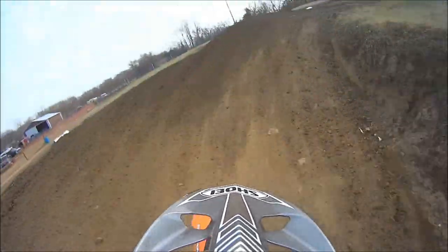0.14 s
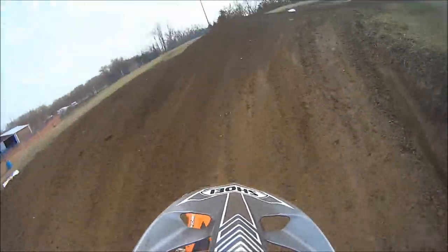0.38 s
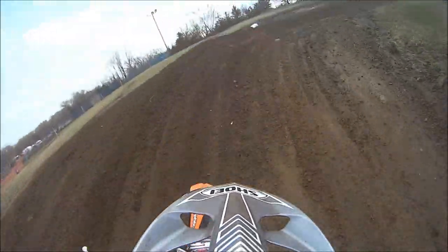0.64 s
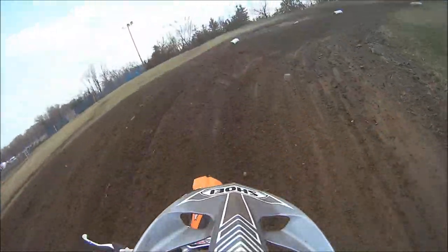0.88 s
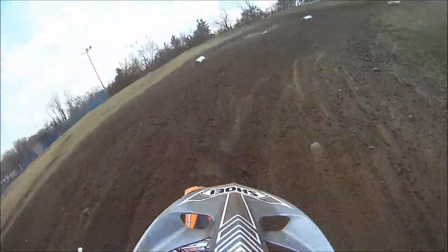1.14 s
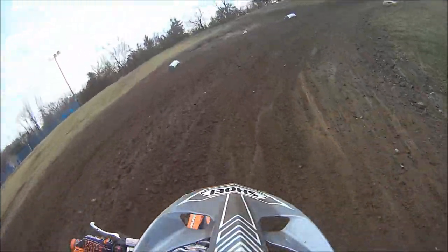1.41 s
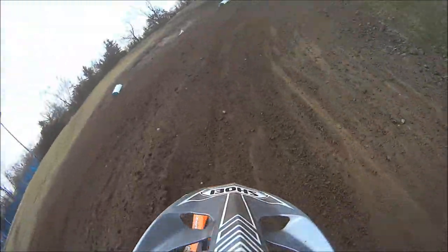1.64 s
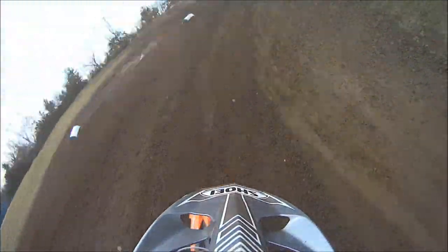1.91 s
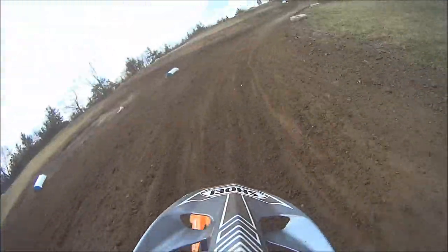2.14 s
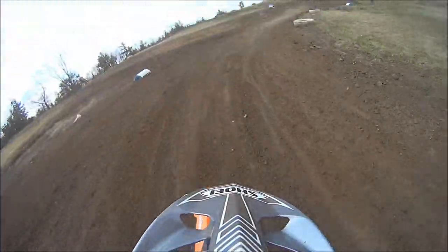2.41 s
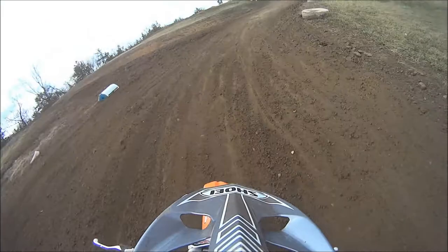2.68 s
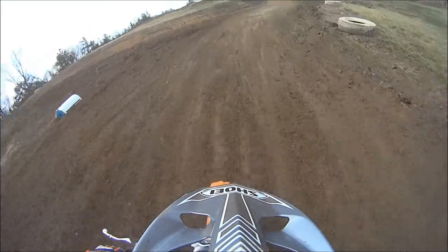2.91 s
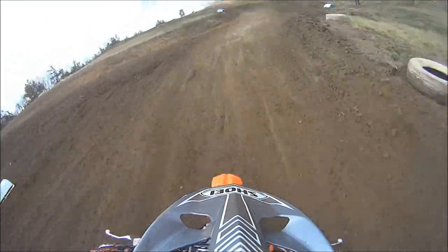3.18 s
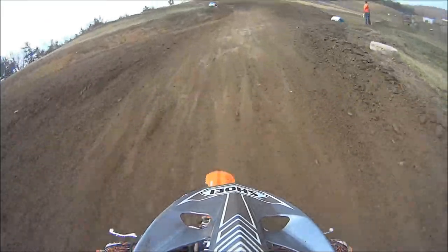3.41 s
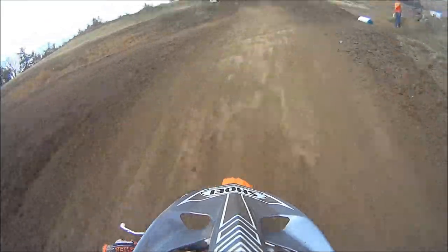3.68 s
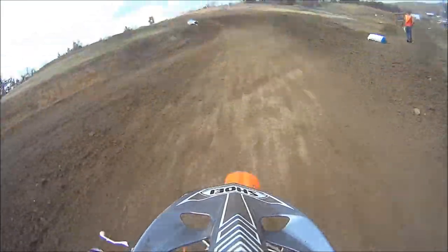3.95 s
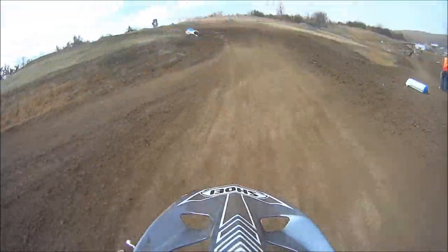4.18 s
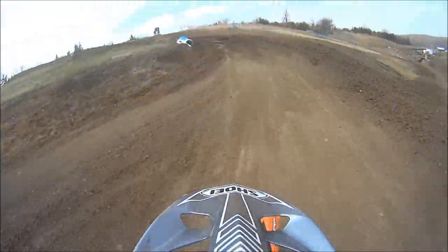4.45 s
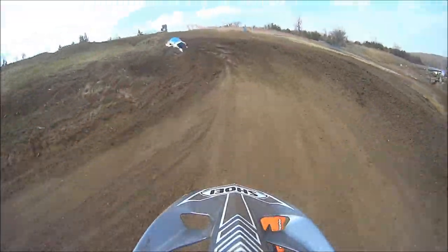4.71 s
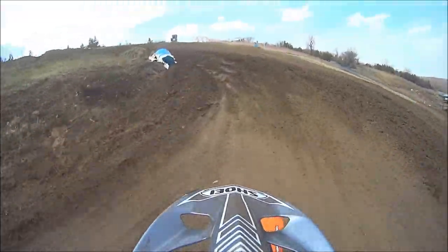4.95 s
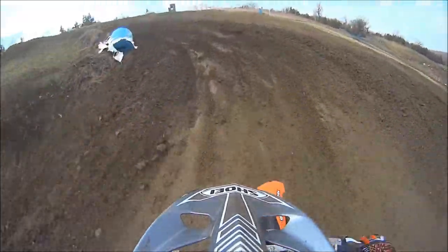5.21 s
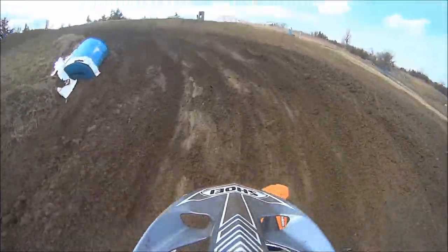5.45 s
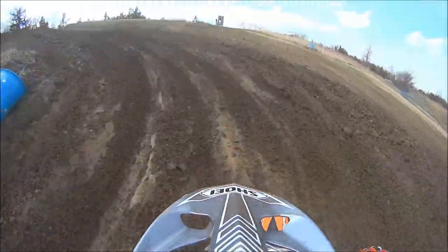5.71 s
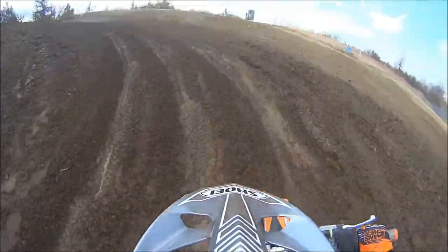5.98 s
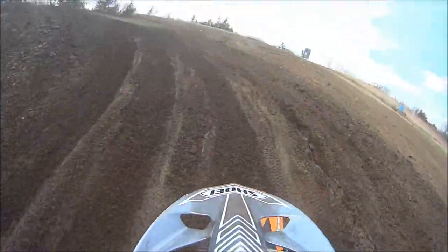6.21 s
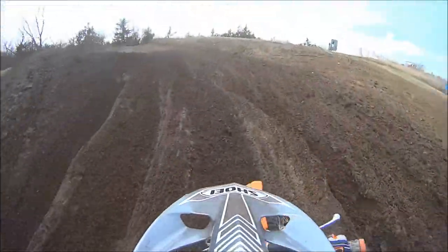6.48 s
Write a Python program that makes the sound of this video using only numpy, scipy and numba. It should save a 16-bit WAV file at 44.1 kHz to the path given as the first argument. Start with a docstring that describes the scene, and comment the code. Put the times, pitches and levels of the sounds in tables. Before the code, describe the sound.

A single-cylinder two-stroke motorcycle, very close, in uneven stereo. First a subdued low burble with shell clicks and jolts, then a loud ragged rev rising in waves, with a brief cut midway. It falls back to a soft ringing putter with clustered ticks and bumps, then snarls up again. Dull tyre and air noise lies beneath, and the top end is muffled.

```python
"""Small two-stroke motorcycle from the helmet

A surging exhaust note is built from sixteen crank orders; noise and pulses gated by the firings make a rasp
of gas and metal, a ring of two to three kilohertz and a narrow cavity drone around one.
Low thumps, probably jolts of the ride, swell shaped low noise over a low rumble; tyres and air rush dully below.
Knocks come through the helmet as decaying ticks, rattles and thuds."""
import sys
import numpy as np
from scipy import signal
from scipy.fft import rfft, irfft
from scipy.io import wavfile
from scipy.ndimage import uniform_filter1d
from numba import njit

SR = 44100
rng = np.random.default_rng(int(sys.argv[2]) if len(sys.argv) > 2 else 0)


def amplitude_ratio(level_db):
    """Convert a level in decibels to the matching linear amplitude (field) ratio."""
    exponent = np.asarray(level_db, float) / 20
    return 10 ** exponent


def put_to_file(sound):
    """Save the sound as 16-bit audio at rate SR, in the file named by the first command-line argument."""
    columns = np.atleast_2d(sound).T  # one column per channel
    safe = np.clip(columns, -1, 1)
    whole_steps = np.round(safe * 32767)
    wavfile.write(sys.argv[1], SR, whole_steps.astype(np.int16))


N = 291060   # length in samples, 6.6 s
LEFT_RIGHT = np.array([[1], [-1]])   # sign of a left-right difference


def in_time(rows):
    """Table columns after the time, joined by straight lines, one value a sample."""
    s, *columns = np.transpose(rows)
    return [np.interp(np.arange(N) / SR, s, c) for c in columns]


def at_hz(points, hz):
    """A spectrum read on a log-frequency axis."""
    f, v = np.transpose(points)
    return np.interp(np.log(np.maximum(hz, 1)), np.log(np.maximum(f, 1)), v)


def rms_one(x):
    """Scaled to unit power."""
    return x / np.sqrt(np.mean(x ** 2) + 1e-20)


def drift(rate_hz):
    """Slow random wander of spread 1: low-passed noise drawn every 40 samples and joined by lines."""
    pole = np.exp(-2 * np.pi * rate_hz * 40 / SR)
    noise = rng.standard_normal(N // 40 + 2002)
    slow = signal.lfilter([1], [1, -2 * pole, pole ** 2], noise)[2000:]   # skip the settling
    return np.interp(np.arange(N) / 40, np.arange(len(slow)), rms_one(slow))


def swell(s, half_s, db):
    """A bell-shaped change in dB around a moment."""
    return db * np.exp(-((np.arange(N) / SR - s) / half_s) ** 2)


def coloured(x, spectrum):
    """Shaped by a spectrum in dB, then scaled to unit power."""
    gain = amplitude_ratio(at_hz(spectrum, np.arange(N // 2 + 1) * SR / N))
    return rms_one(irfft(rfft(x) * gain, N))


@njit
def resonate(x, hz, r):
    """Two-pole resonance whose centre and pole radius may move."""
    y = np.zeros(len(x))
    for i in range(2, len(x)):
        drive = (1 - r[i] ** 2) / 2 * (x[i] - x[i - 2])
        turn = 2 * r[i] * np.cos(2 * np.pi * hz[i] / SR)
        y[i] = drive + turn * y[i - 1] - r[i] ** 2 * y[i - 2]
    return y


def ring(x, hz, width_hz):
    """Resonance of a given bandwidth, at least 20 Hz; both settings may be fixed or moving."""
    radius = np.exp(-np.pi * np.maximum(width_hz + np.zeros(N), 20) / SR)
    return resonate(x, hz + np.zeros(N), radius)


# stereo balance of the ports, also used by the exhaust: freq_hz, left_minus_right_db
PORT_BALANCE = [(60, 5), (110, 0.0), (190, -1.5), (340, -3.5), (600, -7.0), (1070, -17.5), (1900, 0),
                (3380, -3.5), (6010, -2), (10700, -2.0)]
# phase by which the left leads, also used by the exhaust: freq_hz, lead_rad
PORT_LEAD = [(0, 0), (690, -1.3), (950, 0.0), (1210, 0.2), (1640, -0.3), (2070, -1.5), (2410, -0.3),
             (3450, 0.4), (4220, 0.1), (5170, 0.1), (7320, -0.2), (8010, 0.0), (10100, -0.1), (10900, 0.1)]
# how alike the two ports hear: freq_hz, correlation (0 to 1)
PORT_LIKENESS = [(60, 0.8), (130, 0.39), (260, 0.24), (550, 0.21), (1160, 0.63), (2430, 0.19), (5090, 0.66),
                 (10700, 0.46)]


def ports(x, other):
    """Two ports in a housing: level and phase differ by frequency, and an unlike part is mixed in."""
    hz = np.arange(N // 2 + 1) * SR / N
    alike = np.clip(at_hz(PORT_LIKENESS, hz), 0, 1)
    pair = np.sqrt(1 + alike) * rfft(x) + LEFT_RIGHT * np.sqrt(1 - alike) * rfft(other)
    balance = amplitude_ratio(LEFT_RIGHT * at_hz(PORT_BALANCE, hz) / 2)
    lead = np.exp(.5j * LEFT_RIGHT * at_hz(PORT_LEAD, hz))
    return irfft(pair * balance * lead, N) / np.sqrt(2)


# gain of the exhaust pipe: freq_hz, gain_db
PIPE = [(80, -20), (105, -15), (140, -22), (170, -9), (210, -1.5), (270, 2), (350, -1), (410, -3),
        (475, -12), (550, 0), (640, -3), (750, -8), (880, -4), (1150, -6), (1350, -20), (2200, -18)]
# single orders swell or sink for a while: centre_s, half_length_s, change_db, order
ORDER_SWELLS = [(1.87, .08, 6, 9), (.85, .3, -6, 2), (.85, .3, -5, 6), (.85, .3, -6, 7), (2.86, .07, 6, 6),
                (3.02, .06, 5, 3), (3.32, .07, 11, 1), (3.82, .06, 6, 3), (3.93, .07, 5, 4),
                (4.1, .1, 7, 1), (4.1, .12, 8, 7), (3.55, .12, 4, 2), (4.55, .2, 8, 9), (4.6, .4, 10, 8),
                (4.9, .25, 8, 10), (5.3, .5, -6, 3), (5.3, .4, -6, 4), (5.6, .35, 6, 9), (6.04, .04, 8, 4),
                (6.55, .1, 15, 4)]
# lasting lift or cut of single orders: order, change_db
ORDER_TRIM = [(2, -1.), (4, 1.5), (5, -3.5), (6, 2.), (7, -2.5)]


def exhaust(turns, speed, pull_db):
    """Crank orders through the pipe; each wavers in level and phase, the higher ones more."""
    out = np.zeros((2, N))
    for k in range(1, 17):
        hz = k * speed
        change_db = sum(swell(*row) for *row, order in ORDER_SWELLS if order == k)
        change_db = change_db + dict(ORDER_TRIM).get(k, 0)
        waver_db = 2.3 * drift(16.0) if k < 5 else 2.8 * drift(9.)
        order_db = -1.2 * k * (speed / 128) ** 1.5   # high orders lose more as the revs climb
        level_db = -20 + pull_db + order_db + at_hz(PIPE, hz) + waver_db + change_db
        phase = 2 * np.pi * k * turns + 0.08 * k * drift(24.5) + rng.uniform(0, 2 * np.pi)
        balance_db = LEFT_RIGHT * at_hz(PORT_BALANCE, hz) / 2
        lead = LEFT_RIGHT * at_hz(PORT_LEAD, hz) / 2
        out += amplitude_ratio(level_db + balance_db) * np.sin(phase + lead)
    return np.sqrt(2) * out


def blasts(turns, depth, uneven_db, pulse):
    """Noise gated by the firings, uneven from stroke to stroke, in two draws.

    The first draw also has a sharp pulse as the port opens."""
    strength = amplitude_ratio(uneven_db * rng.standard_normal(1500))[turns.astype(int)]
    gate = 1 - depth + depth * 2 * np.sin(np.pi * turns) ** 2
    jittered = turns + .5 + .005 * drift(30.)
    opening = np.diff(np.floor(jittered), prepend=0).clip(0, 1)
    clicks = pulse * rms_one(opening) * np.array([[1], [0]])
    return strength * (gate * rng.standard_normal((2, N)) + clicks)


# spectrum of gas and metal noise, relative: freq_hz, density_db (per Hz)
RASP_SPECTRUM = [(100, -40.), (300, -10), (1100, -13.5), (1380, -10.5), (1650, -5), (2100, -10), (2900, -8),
                 (3700, -4.5), (4500, -6.5), (5100, -4.5), (5700, -11.), (7300, -12.), (9800, -13.5),
                 (11100, -23), (12500, -78)]
# whistling resonances of fins and shell: freq_hz, width_hz, level_db (re the broad noise)
SHELL_WHISTLES = [(2960., 25, -18.5), (4010., 23, -27), (5180, 160, -19), (6010, 32.4, -25.5)]
# bands of the rasp that shift with revs: low_hz, high_hz, slope_db (per octave of revs)
REV_BANDS = [(2700, 5000, -4.5), (7500, 12000, 7.)]


def rasp(turns, speed, throttle_db):
    """Broad gas and metal noise; narrow resonances flare up and fade, some wandering, some following the revs."""
    gas = blasts(turns, depth=0.044, uneven_db=0.72, pulse=0.28)
    broad = [coloured(g, RASP_SPECTRUM) for g in gas]
    for hz, width_hz, db in SHELL_WHISTLES:
        whistle = ring(gas[0], hz * (1 + 0.0049 * drift(2.5)), width_hz)
        broad[0] += amplitude_ratio(db + 4.1 * drift(2.0)) * rms_one(whistle)
    bend, flares = (speed / 128.0) ** 0.058, 0   # pitch rises slightly with the revs
    for hz in np.geomspace(1500., 7500., num=22) * rng.uniform(0.98, 1.04, 22):
        flares = flares + amplitude_ratio(-1.5 + 4. * drift(5.)) * ring(broad[0], hz * bend, 60.)
    out = ports(broad[0] + flares, broad[1])
    for low_hz, high_hz, slope_db in REV_BANDS:
        sos = signal.butter(2, [low_hz, high_hz], "band", fs=SR, output="sos")
        band = signal.sosfiltfilt(sos, out)
        out = out + (amplitude_ratio(slope_db * np.log2(speed / 118.)) - 1) * band
    return amplitude_ratio(throttle_db - 1.0 + 0.62 * drift(10.4)) * out


# bandwidth of the wandering ring: time_s, width_hz
RING_BANDWIDTH = [(0, 800), (4.15, 800), (4.3, 1150), (4.8, 1150), (5.0, 520), (6.2, 650), (6.35, 330),
                  (6.6, 330)]


def wandering_ring(turns, level_db, hz):
    """Firing bursts through two equal resonances whose shared centre moves between two and three kilohertz."""
    (width_hz,) = in_time(RING_BANDWIDTH)
    gas = blasts(turns, depth=0.2, uneven_db=1.5, pulse=0.6)
    twice = [ring(ring(g, hz, width_hz), hz, width_hz) for g in gas]
    pair = [rms_one(x / np.sqrt(width_hz)) for x in twice]   # level held as the width moves
    return amplitude_ratio(level_db + 1.7 * drift(14.5)) * ports(*pair)


# moments when the drone swells: centre_s, half_length_s, change_db
CAVITY_SWELLS = [(1.5, .06, 4), (4.1, .12, 5), (4.55, .35, 4), (6.1, .05, 6), (6.4, .08, 3)]


def drone(turns, speed, pull_db, pan_db):
    """A narrow cavity excited by the firings: two resonances in series, mostly louder on the right."""
    level_db = -31.5 + 0.39 * pull_db - 4 * np.log2(speed / 128)   # softer as the revs rise
    level_db = level_db + sum(swell(*row) for row in CAVITY_SWELLS)
    gas = blasts(turns, depth=0.32, uneven_db=2.0, pulse=2.0)
    mid, side = [rms_one(ring(ring(g, 1118.0, 214.0), 1010.0, 340.0)) for g in gas]
    gain = amplitude_ratio(level_db + 1.5 * drift(8.) + LEFT_RIGHT * pan_db / 2)
    return gain * (mid + 0.45 * LEFT_RIGHT * side)


# spectrum of the low thumps and rumble, relative: freq_hz, density_db (per Hz)
LOW_SPECTRUM = [(12, -38), (20, -8), (53, -2.5), (80, -9.5), (203, -14), (290, -24), (365, -39), (478, -26),
                (600, -40), (780, -40), (1320, -120)]
# low thumps, probably jolts of the ride: peak_s, level_db, fall_s (time to die by 10 dB)
LOW_JOLTS = [(.05, -18.5, .14), (.27, -22, .17), (.57, -30, .08), (1.02, -34, .1), (1.3, -29, .04),
             (1.45, -33, .03), (1.56, -31, .2), (2.14, -22, .05), (2.32, -28, .1), (2.59, -26, .09),
             (3.14, -21, .09), (3.47, -30, .08), (3.64, -30, .11), (3.97, -26, .06), (4.08, -20.5, .03),
             (4.28, -23, .06), (4.49, -23, .12), (4.94, -29, .06), (5.06, -27.5, .03), (5.15, -18, .04),
             (5.41, -20, .07), (5.62, -27, .11), (5.84, -21.5, .06), (5.97, -25.5, .08), (6.27, -21.5, .1)]
# low rumble between jolts: time_s, level_db
LOW_RUMBLE = [(0, -36), (.7, -41), (2.0, -46), (3.9, -47), (4.3, -35), (5.3, -32), (6.6, -32)]


def jolts():
    """Lumpy low noise, nearly the same in both ports; thumps rise fast and die away over a low rumble."""
    t, (level_db,) = np.arange(N) / SR, in_time(LOW_RUMBLE)
    for s, db, fall_s in LOW_JOLTS:
        rise_db = 350 * (t - s)   # 350 dB per second
        fall_db = 10 * (s - t) / fall_s
        level_db = np.maximum(level_db, db + np.minimum(rise_db, fall_db))
    mid, side = [coloured(rng.standard_normal(N), LOW_SPECTRUM) for _ in range(2)]
    # partly level out the chance swings of the noise
    even = mid / (0.45 + np.sqrt(uniform_filter1d(mid ** 2, size=3000) + 1e-9))
    return amplitude_ratio(level_db + 1.45 * drift(27.0)) * (rms_one(even) + 0.3 * side * LEFT_RIGHT)


# knocks through the helmet, levels before the trims below: start_s, level_db, pitch_hz, thud_db
HELMET_KNOCKS = [(0.098, -12, 902, -24), (0.107, -5.5, 1660, -21), (0.127, -15, 2960, -22),
                 (0.178, -10, 1290, -20), (0.236, -18, 2960, -35), (0.249, -14, 1670, -13.5),
                 (0.263, -13, 1810, -29), (0.301, -20, 2900, -36), (0.317, -11, 1560, -13.5),
                 (0.352, -15, 2920, -45), (0.403, -22, 3110, -35), (3.154, -22, 2153, -26),
                 (4.059, -11, 1570, -14), (4.329, -17, 2400, -34), (4.349, -18, 2306, -29),
                 (4.554, -17, 2030, -39), (4.574, -12, 2020, -30), (4.599, -28, 956, -32),
                 (4.652, -16, 2160, -36), (4.687, -8, 1900, -32), (4.721, -12, 2228, -30),
                 (4.734, -9.5, 2540, -36), (4.784, -13, 2130, -40), (4.799, -12, 2620, -35),
                 (4.824, -12.5, 2480, -38), (4.844, -15, 1620, -34), (5.129, -20, 2347, -25),
                 (5.189, -17, 2770, -34), (5.389, -28, 2370, -22), (5.959, -15, 1500, -24),
                 (6.029, -25, 2160, -35)]


def knocks():
    """Each knock: a hard tick ringing at its own pitch with some rattle, and a dull thud of the shell."""
    out, t = np.zeros((2, N + 3000)), np.arange(3000) / SR
    for s, db, hz, thud_db in HELMET_KNOCKS:
        i, noise = round(s * SR), rng.standard_normal((2, 3000))
        thin = np.clip((hz - 1700.) / 670.0, 0, 1)   # high knocks are more rattle than tick
        wide = signal.butter(2, [hz / 1.4, hz * 1.4], "band", fs=SR)
        rattle = rms_one(signal.lfilter(*wide, noise[0] + 0.83 * noise))
        rattle = rattle * np.exp(-t / (0.0038 + .004 * thin))
        tick = np.sin(2 * np.pi * hz * t) * np.exp(-t / 0.0018)
        dull = signal.lfilter(*signal.butter(2, 450., fs=SR), noise[1])
        thud = rms_one(dull) * np.exp(-t / 0.013)
        out[:, i:i + 3000] += amplitude_ratio(db - 6.0) * rattle
        out[:, i:i + 3000] += amplitude_ratio(db - 0.5 - 9. * thin) * tick + amplitude_ratio(thud_db - 0.5) * thud
    return out[:, :N]


def rush():
    """Dull noise of tyres and air under everything: a gentle 150-900 Hz band, wandering slowly in level."""
    sos = signal.butter(1, [150., 900.], "band", fs=SR, output="sos")
    mid, side = signal.sosfilt(sos, rng.standard_normal((2, N)))
    return amplitude_ratio(-43. + 3.3 * drift(2.9)) * ports(rms_one(mid), rms_one(side))


# crank speed, surging as the rear wheel slips and grips: time_s, firings_per_s
CRANK_SPEED = [(0.0, 101.7), (0.11, 89.4), (0.26, 90.1), (0.33, 94.7), (0.5, 79.3), (0.57, 78.8),
               (0.64, 99.6), (0.72, 92.5), (0.79, 93.7), (0.99, 87.2), (1.1, 88.3), (1.21, 107.6),
               (1.36, 80.1), (1.42, 80.1), (1.67, 118.1), (1.78, 110.0), (1.82, 101.1), (1.89, 100.6),
               (1.93, 110.5), (2.08, 137.0), (2.13, 111.3), (2.17, 120.2), (2.26, 111.0), (2.35, 119.9),
               (2.43, 137.7), (2.7, 130.9), (2.94, 154.3), (3.01, 188.4), (3.1, 161.7), (3.16, 157.3),
               (3.2, 173.4), (3.29, 205.9), (3.33, 212.6), (3.38, 181.4), (3.44, 123.0), (3.46, 119.1),
               (3.53, 147.4), (3.58, 131.7), (3.64, 131.7), (3.73, 144.5), (3.82, 183.6), (3.9, 155.3),
               (3.95, 167.1), (4.01, 148.4), (4.08, 159.6), (4.15, 160.7), (4.23, 130.4), (4.3, 120.8),
               (4.45, 127.1), (4.96, 103.4), (5.16, 97.3), (5.77, 99.9), (6.07, 95.4), (6.16, 118.8),
               (6.19, 127.3), (6.27, 99.6), (6.3, 92.3), (6.36, 90.7), (6.49, 103.2), (6.6, 95.9)]
# throttle, as the level of the rasp before its trim: time_s, level_db
THROTTLE_LEVEL = [(0, -30), (.11, -36), (.48, -39), (.64, -31), (1.21, -30), (1.36, -36), (1.42, -34.5),
                  (1.64, -22.5), (1.87, -24), (1.94, -21), (2.08, -20), (2.15, -24), (2.35, -21),
                  (2.7, -17), (2.94, -20), (3.01, -17.5), (3.3, -17.5), (3.38, -20.5), (3.42, -31),
                  (3.49, -19.5), (3.64, -21), (3.82, -18), (4.16, -19), (4.23, -33.5), (4.66, -34),
                  (4.78, -31), (5.0, -34), (5.33, -34), (5.92, -29), (6.01, -24), (6.18, -18), (6.3, -26),
                  (6.38, -22.5), (6.6, -20)]
# how hard the engine pulls, as the strength of the exhaust note: time_s, pull_db (re full pull)
ENGINE_PULL = [(0, -27), (.45, -29), (.57, -20), (.66, -16), (1.05, -19), (1.21, -20), (1.36, -30),
               (1.44, -15), (1.53, -8), (1.67, -2), (1.9, -4), (2.08, 0), (2.5, 2), (2.9, -1), (3.1, 0),
               (3.25, -3), (3.34, -9), (3.41, -27), (3.46, -6), (3.5, -3), (3.8, 0), (3.95, -3), (4.1, -11),
               (4.17, -12), (4.23, -19), (4.7, -19), (5.0, -24), (5.8, -21), (6.02, -11), (6.1, -2),
               (6.17, -1), (6.24, -10), (6.3, -14), (6.42, -13), (6.6, -11)]
# the head turns: time_s, ring_hz, ring_db (above the throttle level), drone_left_minus_right_db
HEAD_TURNS = [(0, 2100, 11, -1), (.04, 3000, 13, -1), (.1, 2700, 7, -1), (.19, 2300, -2, -1),
              (.27, 2400, 6, 0), (.38, 3000, 6, -2), (.55, 3100, 0, -13), (1.0, 2850, -3, -13),
              (1.4, 2900, 0, -12), (1.63, 2880, -5, -12), (2.4, 2850, -2, -11), (2.6, 2330, -6, -11),
              (3.12, 2150, -9, -10), (3.34, 1920, 2, -10), (3.45, 2000, 0, -10), (3.6, 1900, -3, -10),
              (3.71, 1950, 2, -9), (4.17, 1980, -2, -11), (4.31, 2100, 13, -7), (4.42, 2250, 6, -7),
              (4.55, 1950, 12, -7), (4.83, 2350, 7, -6), (4.95, 2350, 2, -11), (5.3, 2400, 3, -11),
              (5.8, 2450, 0, -12), (6.05, 2250, -1, -10), (6.19, 2700, -4, -12), (6.3, 2320, 1, -11),
              (6.45, 2320, 6, -11), (6.6, 2290, 1, -11)]


def scene():
    """Engine layers share one crank; throttle drives rasp and ring, pull drives exhaust note and drone."""
    (speed,), (throttle_db,), (pull_db,) = in_time(CRANK_SPEED), in_time(THROTTLE_LEVEL), in_time(ENGINE_PULL)
    ring_hz, ring_db, pan_db = in_time(HEAD_TURNS)
    turns = np.cumsum(speed) / SR   # one firing a turn
    engine = exhaust(turns, speed, pull_db) + rasp(turns, speed, throttle_db)
    engine = engine + wandering_ring(turns, throttle_db + ring_db, ring_hz)
    engine = engine + drone(turns, speed, pull_db, pan_db)
    return engine + jolts() + rush() + knocks()


def top_cut(x):
    """Nothing passes above the cut-off."""
    return signal.sosfilt(signal.butter(12, 11280, fs=SR, output="sos"), x)


def record(dry):
    """Peaks are rounded by a soft saturation curve."""
    mix = 1.051 * np.tanh(dry / 1.133)
    return top_cut(mix)


dry = scene()
out = record(dry)
put_to_file(out)
```